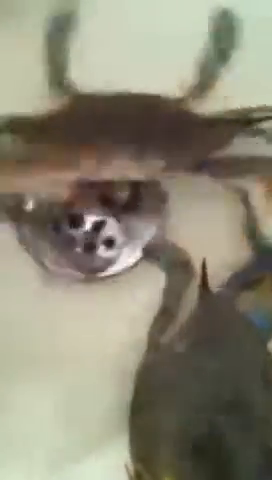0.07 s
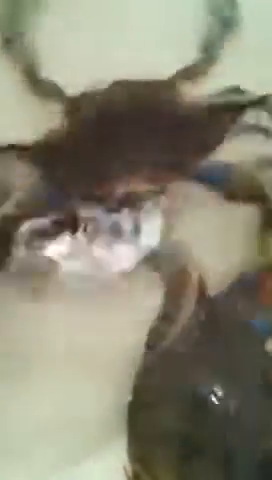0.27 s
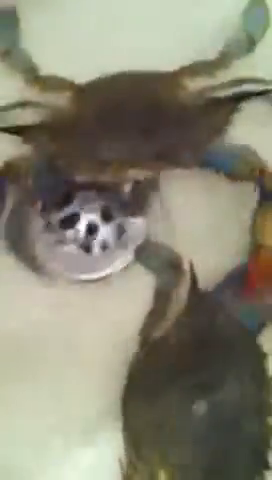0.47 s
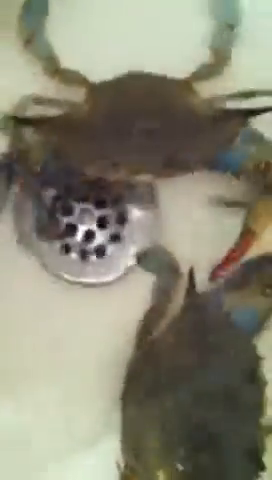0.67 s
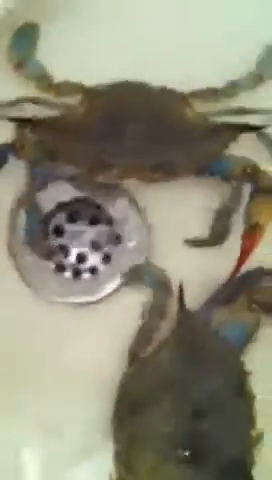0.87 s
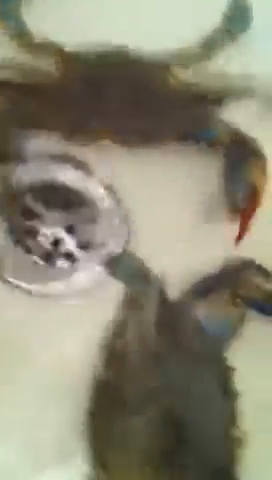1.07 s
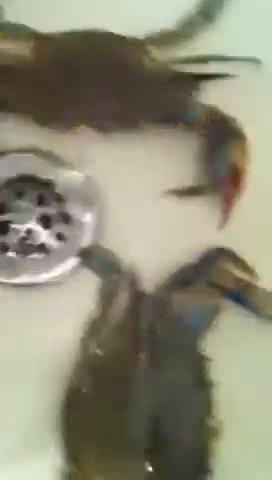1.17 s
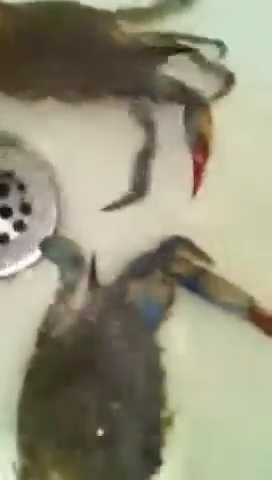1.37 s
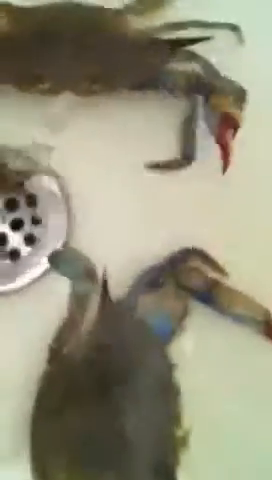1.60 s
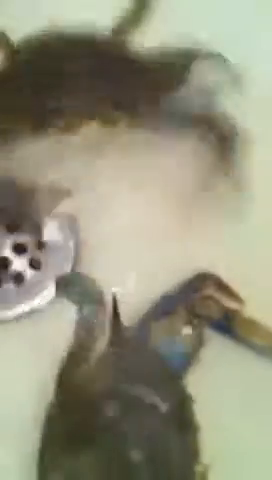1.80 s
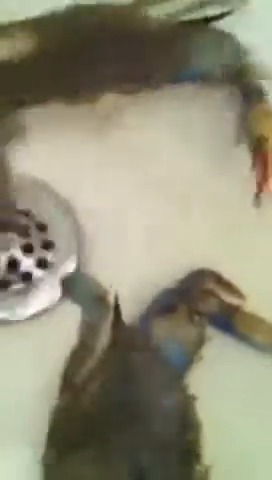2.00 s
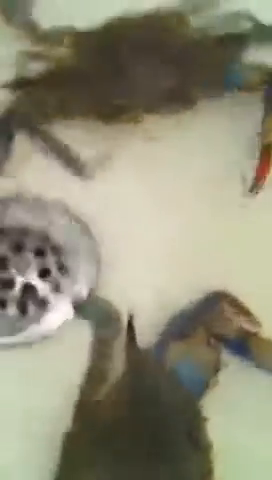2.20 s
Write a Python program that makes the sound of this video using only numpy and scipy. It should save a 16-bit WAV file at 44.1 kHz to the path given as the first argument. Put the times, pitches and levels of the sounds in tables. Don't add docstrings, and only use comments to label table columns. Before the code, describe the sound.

Crab claws snap and knock hard against an enamel tub and metal drain, a loud cluster early and another near the end, with small watery pops, in a small reverberant bathroom, close thin-sounding microphone.

```python
import sys
import numpy as np
from scipy import signal
from scipy.fft import rfft, irfft
from scipy.io import wavfile
from scipy.ndimage import uniform_filter1d, minimum_filter1d

SR = 44100
rng = np.random.default_rng(int(sys.argv[2]) if len(sys.argv) > 2 else 0)


def convert_level_to_amplitude(level_db):
    exponent = np.asarray(level_db, float) / 20
    return 10 ** exponent


def materialize(psi):
    bounded = np.clip(np.atleast_2d(psi).T, -1, 1)
    quanta = np.round(bounded * 32767).astype(np.int16)
    wavfile.write(sys.argv[1], SR, quanta)


N = 99225
KNOCK_RISE_MS = 0.2105


def evened(x):
    return x / np.sqrt(np.mean(x ** 2) + 1e-20)


def read(points, hz):
    f, value = np.transpose(points)
    return np.interp(np.log(hz + 1), np.log(f + 1), value)


def add(mix, start_s, sound):
    part = mix[round(start_s * SR):][:len(sound)]
    part += sound[:len(part)]


def resonate(x, hz, width_hz):
    turn = np.exp(2j * np.pi * hz * np.arange(len(x)) / SR)
    pole = np.exp(-np.pi * width_hz / SR)
    return 2 * (turn * signal.lfilter([1 - pole], [1, -pole], x / turn)).real


def band_pass(x, low_hz, high_hz):
    return signal.sosfilt(signal.butter(2, [low_hz, high_hz], "band", fs=SR, output="sos"), x)


def low_pass(x, hz):
    return signal.oaconvolve(x, signal.firwin(511, hz, window=("kaiser", 8), fs=SR)[None], "same")


def struck(t, rise_ms, t60_ms):
    return (1 - np.exp(-(1000 * t / rise_ms) ** 2)) * convert_level_to_amplitude(-60 * 1000 * t / t60_ms)


def wobbles(t, count):
    rough, rough_ms = 0.45, 4
    span = round(rough_ms * SR / 1000)
    z = rng.standard_normal((count, 2, len(t)))
    z = uniform_filter1d(uniform_filter1d(z, span), span)
    onset = np.minimum(t * 1000 / rough_ms / 2, 1)
    return 1 + rough * onset * (z[:, 0] + 1j * z[:, 1]) / z.std()


def hum():
    # (frequency [Hz], density [dB per Hz])
    hum_tone = [(40, -41), (85, -36), (135, -3.5), (260, -1.5), (420, -14), (1100, -15), (4000, -24),
                (15500, -25)]
    # (frequency [Hz], width [Hz], level [dB])
    hum_peaks = [(149.3, 50.7, -70.5), (243, 14, -72)]
    hiss_db, patch_db = -65.5, 1.3
    duck_s, duck_db, duck_back_s = 1.81, -5.5, 2.2
    frames, hz = N // 256 + 5, np.fft.rfftfreq(1024, 1 / SR)
    a, b, patches = rng.standard_normal((frames, 513, 3)).T
    patches = evened(uniform_filter1d(uniform_filter1d(patches, 12, 0), 10, 1))
    z = (a + 1j * b) * convert_level_to_amplitude(read(hum_tone, hz)[:, None] + patch_db * patches)
    out = convert_level_to_amplitude(hiss_db) * evened(signal.istft(z, nperseg=1024, noverlap=768)[1][:N])
    for peak_hz, width_hz, db in hum_peaks:
        fuzz = resonate(rng.standard_normal(N), peak_hz, width_hz)
        out = out + convert_level_to_amplitude(db) * evened(resonate(fuzz, peak_hz, width_hz))
    after_s = np.arange(N) / SR - duck_s
    return out * convert_level_to_amplitude(duck_db * (after_s > 0) * np.exp(-abs(after_s) / duck_back_s))


def bubbles(mix):
    # (time [s], level [dB], start pitch [Hz], pitch rise [fraction per 10 ms], t60 [ms])
    pops = [
        (1.7830, -34, 2000, .55, 20),
        (1.7970, -46, 2100, .02, 25),
        (1.9570, -47, 680, .12, 40),
        (1.9620, -45, 800, .015, 110),
        (1.9640, -43, 880, .11, 110),
        (2.1590, -57, 4400, .08, 20),
        (.0020, -56, 2300, .01, 60),
        (.4090, -36.5, 1605, .002, 45),
        (1.7420, -59, 2800, .06, 90),
        (1.686, -63, 3500, .002, 70),
    ]
    rise_ms, glide_stop_ms = 4, 19.9
    t = np.arange(8000) / SR
    for (s, db, hz, rise, t60_ms), wobble in zip(pops, wobbles(t, len(pops))):
        turns = np.cumsum(hz * (1 + rise * np.minimum(t * 1000, glide_stop_ms) / 10)) / SR
        tone = (wobble * np.exp(2j * np.pi * turns)).imag
        add(mix, s, convert_level_to_amplitude(db) * struck(t, rise_ms, t60_ms) * tone)


def room(x):
    # (frequency [Hz], t60 [s])
    wall_t60 = [(300, 0.1964), (900, 0.298), (2000, 0.15), (5500, 0.35), (10000, 0.28), (15000, 0.091)]
    # (frequency [Hz], gain [dB])
    wall_tone = [(300, 2.5), (1000, -5), (2500, 1.5), (6000, -11.5), (12000, -5.5), (16000, 7.5)]
    near_db, near_t60_s, far_db, wall_ms = -12, 0.11, -7.5, 13
    taps = np.zeros((2, SR // 2))
    at = np.arange(40, SR // 2 - 10, 10)
    for row in taps:
        row[at + rng.integers(0, 10, len(at))] = rng.choice([-1., 1.], len(at))
    t = np.arange(SR // 2) / SR
    near = taps[0] * convert_level_to_amplitude(-60 * t / near_t60_s)
    hz, u, z = signal.stft(taps[1], SR, nperseg=256)
    far = signal.istft(z * convert_level_to_amplitude(-60 * u / read(wall_t60, hz)[:, None]), SR, nperseg=256)[1][:len(t)]
    far = far * (1 - np.exp(-(1000 * t / wall_ms) ** 4))
    tone = convert_level_to_amplitude(read(wall_tone, np.fft.rfftfreq(len(t), 1 / SR)))
    far = irfft(rfft(far / np.linalg.norm(far)) * tone, len(t))
    tail = convert_level_to_amplitude(near_db) * near / np.linalg.norm(near) + convert_level_to_amplitude(far_db) * far
    return signal.fftconvolve(x, tail)[:N]


def snaps(mix):
    # (time [s], level [dB], bright centre [Hz], t60 [ms])
    first_bout = [(.0273, -47.5, 9100, 4.4), (0.1567, -58, 7950, 5.9), (.2038, -30, 10000, 40),
                  (.2070, -17, 9000, 8), (.2082, -7, 13000, 8), (.2113, -6.5, 12800, 5),
                  (.2218, -12, 13000, 5), (.2228, -13.5, 11000, 12), (.2250, -21, 10500, 12),
                  (.2302, -24, 7000, 10), (.2872, -24, 13300, 10), (.2903, -30, 13000, 10),
                  (.3185, -38, 11000, 10), (.3790, -45, 11000, 11), (.3843, -36.5, 13200, 44),
                  (.3926, -21.5, 12500, 7.4), (.3930, -26, 5500, 13), (.4003, -22, 8500, 1.2),
                  (.4012, -27, 13000, 8), (1.1196, -59.5, 4660, 7.2), (.7546, -59, 11800, 7.6),
                  (1.0213, -59, 10970, 8.6), (1.249, -52.5, 13100, 7), (1.3962, -52.5, 12000, 8.3),
                  (.0035, -52, 8650, 2.9)]
    # (time [s], level [dB], bright centre [Hz], t60 [ms])
    second_bout = [(1.786, -45, 12000, 2.5), (1.7908, -49, 7200, 7), (1.7960, -34, 5830, 14),
                   (1.8028, -27, 12000, 25), (1.8054, -16, 12000, 6), (1.8056, -21, 6500, 5),
                   (1.8076, -12, 13000, 5), (1.8102, -23, 13000, 12), (1.8230, -33, 7500, 8),
                   (1.8316, -24, 13500, 6), (1.8312, -27, 7100, 5.6), (1.8370, -37, 12500, 14),
                   (1.887, -43, 13000, 7), (1.9192, -46, 5240, 11), (1.9250, -43, 14500, 6),
                   (1.953, -42, 8050, 20), (1.9575, -38.5, 12700, 2), (1.966, -52, 10000, 7.3),
                   (1.978, -63, 9050, 8), (1.9833, -38, 10200, 1.7), (1.9903, -41.5, 14800, 4.5),
                   (2.004, -48, 7780, 14), (2.0390, -49.5, 12030, 8.2), (2.092, -50, 9000, 4),
                   (2.175, -47, 13200, 5.9), (2.174, -46.5, 10000, 7.4), (2.0140, -60, 11000, 7.3)]
    rise_ms, q, broad_db, broad_low = 0.33, 2.21, -11, 0.39
    t = np.arange(3000) / SR
    for s, db, hz, t60_ms in list(first_bout) + list(second_bout):
        wave = rfft(rng.standard_normal(len(t)) * struck(t, rise_ms, t60_ms))
        wave = wave / np.sqrt(uniform_filter1d(abs(wave) ** 2, size=60))
        burst = irfft(wave, len(t)) * (t < t[-1] / 2)
        core = resonate(resonate(burst, hz, hz / q), hz, hz / q)
        broad = signal.sosfilt(signal.butter(3, broad_low * hz, "high", fs=SR, output="sos"), burst)
        sound = core / np.linalg.norm(core) + convert_level_to_amplitude(broad_db) * broad / np.linalg.norm(broad)
        add(mix, s, convert_level_to_amplitude(db) * sound / abs(sound).max())


def knocks(mix):
    # (time [s], level [dB], pitch [Hz], t60 [ms])
    hits = [(0.028, -48, 3430, 26), (.2084, -30, 2000, 7), (.2112, -13, 2450, 4.5), (.2115, -28, 950, 16),
            (.2228, -23, 4200, 6), (0.224, -24.5, 5920, 11), (.2230, -22.5, 1940, 5.6),
            (.2290, -42, 737, 48), (0.288, -35, 4740, 4.9), (0.3186, -34, 3570, 6.4),
            (0.3801, -37.5, 4920, 18), (0.386, -29, 3930, 7.5), (0.3927, -33.5, 1615, 54),
            (.3930, -56, 1790, 20), (0.3933, -29.5, 2190, 7.2), (0.211, -23, 3060, 6.8),
            (0.679, -60, 1446, 82), (1.8075, -28, 3420, 4.2), (1.807, -25.5, 2220, 3.8),
            (1.8080, -32.5, 1110, 2), (1.8078, -36.5, 500, 5.2), (1.8056, -5.5, 11300, 4.5),
            (1.80775, -5, 11900, 3.5), (1.8079, -5, 13300, 3.5), (1.9, -60, 1350, 31),
            (1.9140, -57, 1394, 55), (1.9575, -29, 1280, 1.95), (1.958, -34, 3060, 2),
            (1.9790, -43.5, 2670, 11), (2.0030, -51.5, 3660, 16), (0.254, -52.5, 60, 120),
            (.3920, -57, 44.8, 100), (1.8070, -53, 50.3, 47), (1.8430, -50, 790, 20),
            (1.9836, -33, 2030, 9.3), (2.0920, -38, 1892, 25.3), (2.0921, -46.5, 2200, 17),
            (2.1753, -44.5, 7850, 10), (.0390, -55, 3383, 50), (1.7848, -44, 2210, 5.8),
            (1.8078, -34.5, 1000, 5.6), (.2110, -23.5, 1970, 10), (.3840, -51.5, 900, 25),
            (1.9140, -56, 3900, 20), (1.8077, -38.5, 326, 8.1)]
    t = np.arange(8000) / SR
    for (s, db, hz, t60_ms), wobble in zip(hits, wobbles(t, len(hits))):
        tone = (wobble * np.exp(2j * np.pi * hz * t)).imag
        add(mix, s, convert_level_to_amplitude(db) * struck(t, KNOCK_RISE_MS, t60_ms) * tone)


def scrapes(mix):
    # (time [s], level [dB], low edge [Hz], high edge [Hz], length [ms])
    drags = [
        (0.123, -77.5, 712, 6200, 56),
        (0.152, -59, 850, 4815, 24),
        (.672, -62.5, 1314, 6600, 24),
        (1.05, -74, 1201, 2308, 57),
        (1.675, -74.5, 1983, 6980, 49),
        (1.737, -66, 1953, 9000, 125),
        (1.897, -61.5, 1230, 3340, 28),
        (1.961, -58.5, 1960, 14900, 36),
    ]
    grit_db, peak = 2.5, 0.3
    for s, db, low_hz, high_hz, ms in drags:
        noise, drift = rng.standard_normal((2, 5000))
        u = np.arange(5000) / SR * 1000 / ms / peak
        grit = noise * convert_level_to_amplitude(grit_db * evened(uniform_filter1d(drift, 60)))
        add(mix, s, convert_level_to_amplitude(db) * u * np.exp(1 - u) * evened(band_pass(grit, low_hz, high_hz)))


def grainy_tails(mix):
    # (time [s], level [dB], low edge [Hz], high edge [Hz], t60 [ms])
    tails = [(.2120, -38, 3000, 8000, 120), (.2240, -37, 3000, 9000, 150),
             (.2130, -45.5, 294.4, 2000, 200), (.2920, -53, 9200, 15500, 350),
             (.3940, -45.5, 1350, 6500, 134), (1.8120, -54.5, 620, 1250, 245),
             (1.8100, -56, 3200, 7400, 160), (1.8320, -49, 5000, 9600, 110),
             (.6745, -62.5, 1740, 5400, 83), (2.1760, -62, 7700, 10000, 110),
             (1.9750, -55.5, 750, 1080, 230), (2.0980, -56.5, 1700, 2270, 190),
             (.4300, -66, 1550, 1840, 630), (.2400, -57.5, 190, 450, 450)]
    ticks_per_s, spread_db, tick_ms = 1800, 4, 0.5
    t = np.arange(9000) / SR
    for s, db, low_hz, high_hz, t60_ms in tails:
        chance, size = rng.random((2, len(t)))
        ticks = (chance < ticks_per_s / SR) * convert_level_to_amplitude(-spread_db * np.log(size + .02))
        decay = np.exp(-1000 / tick_ms / SR)
        grains = rng.standard_normal(len(t)) * signal.lfilter([1], [1, -decay], ticks)
        tail_noise = evened(band_pass(grains, low_hz, high_hz))
        add(mix, s, convert_level_to_amplitude(db) * struck(t, KNOCK_RISE_MS, t60_ms) * tail_noise)


def scene():
    knock_room_db, mic_low_hz, low_leak_db = -3, 244, -8
    floor, crabs, hollow = hum(), np.zeros(N), np.zeros(N)
    bubbles(hollow)
    snaps(crabs)
    knocks(hollow)
    scrapes(crabs)
    wet = crabs + hollow + room(crabs + convert_level_to_amplitude(knock_room_db) * hollow)
    grainy_tails(wet)
    thin = signal.butter(2, mic_low_hz, "high", fs=SR, output="sos")
    return (signal.sosfilt(thin, wet) + convert_level_to_amplitude(low_leak_db) * wet + floor)[None]


def top_cut(x):
    return signal.sosfilt(signal.butter(12, 17110, fs=SR, output="sos"), x)


def record(dry):
    hush_under_db, hush_db, hush_ms, hush_hz = 23, -13, 11, 1500
    edge_hz, edge_leak_db, top_hz, offset = 15900, -24, 17050, -0.000099
    level_db = 10 * np.log10(abs(uniform_filter1d(dry ** 2, size=44)) + 1e-12)
    span = round(hush_ms * SR / 1000)
    coming_db = -minimum_filter1d(-level_db, span, origin=-(span // 2))
    depth = np.clip((coming_db - level_db - hush_under_db) / 6, 0, 1)
    hush = convert_level_to_amplitude(hush_db * uniform_filter1d(depth, size=30))
    low = low_pass(dry, hush_hz)
    x = low + hush * (dry - low)
    edge = low_pass(x, edge_hz)
    mix = edge + convert_level_to_amplitude(edge_leak_db) * (low_pass(x, top_hz) - edge) + offset
    return top_cut(mix)


dry = scene()
out = record(dry)
materialize(out)
```